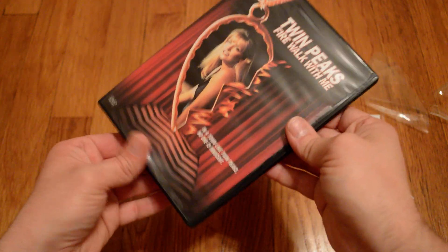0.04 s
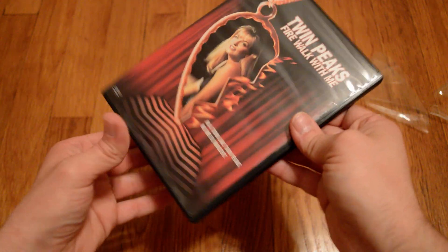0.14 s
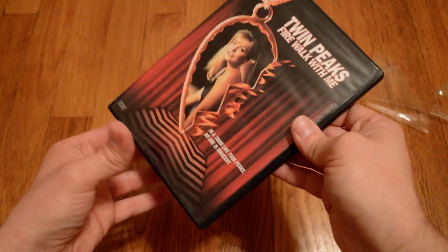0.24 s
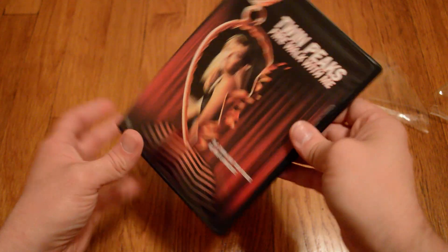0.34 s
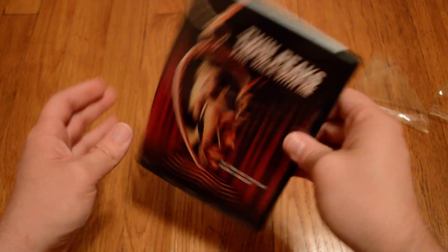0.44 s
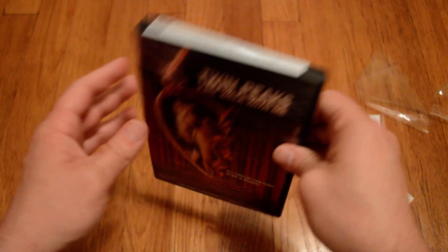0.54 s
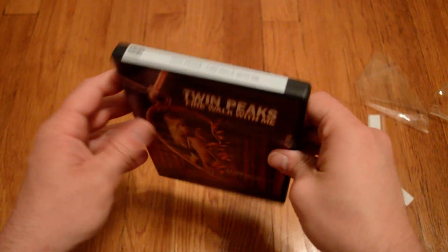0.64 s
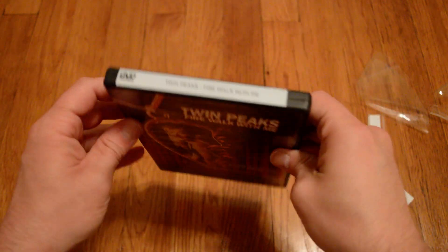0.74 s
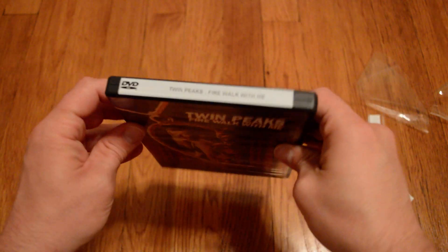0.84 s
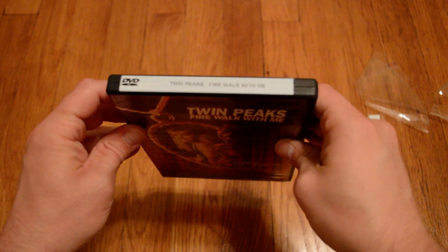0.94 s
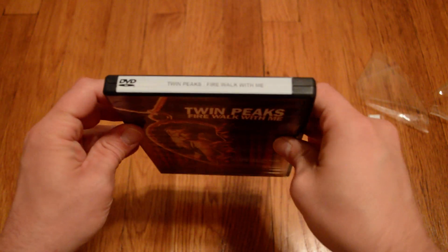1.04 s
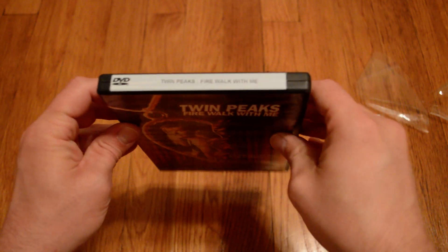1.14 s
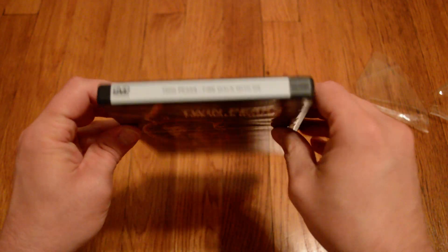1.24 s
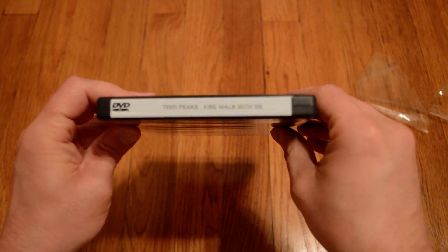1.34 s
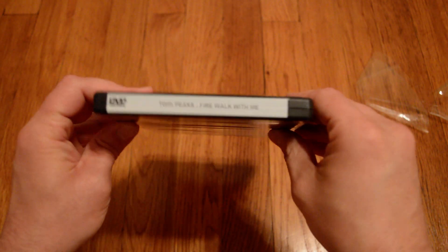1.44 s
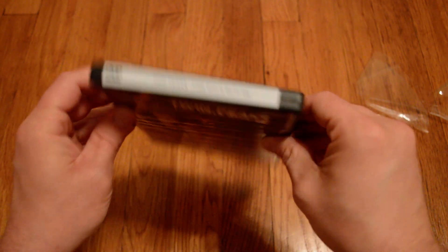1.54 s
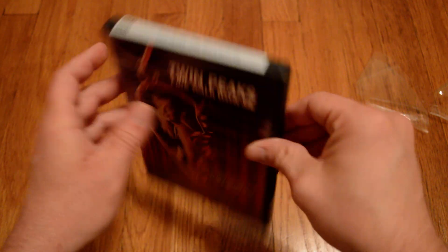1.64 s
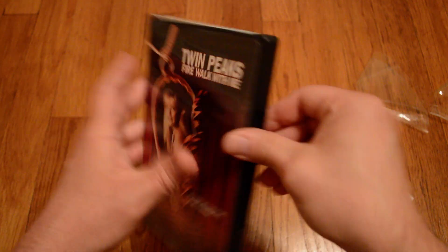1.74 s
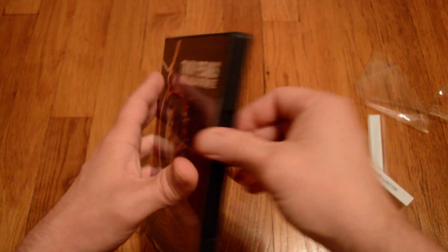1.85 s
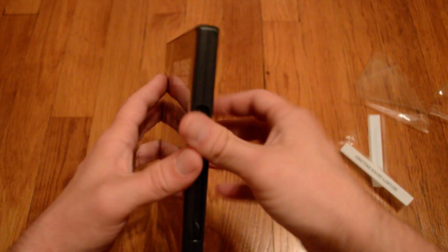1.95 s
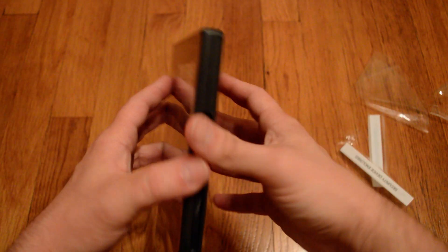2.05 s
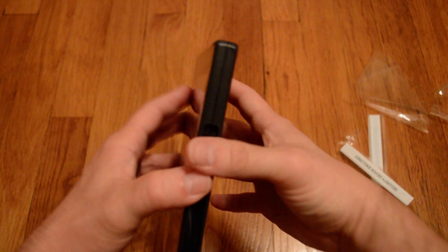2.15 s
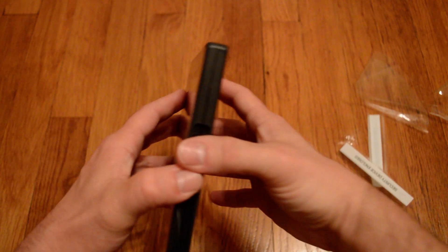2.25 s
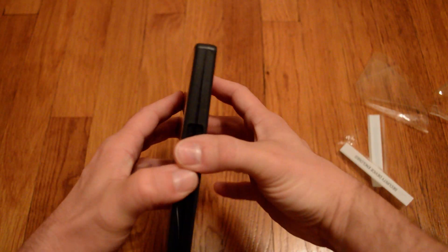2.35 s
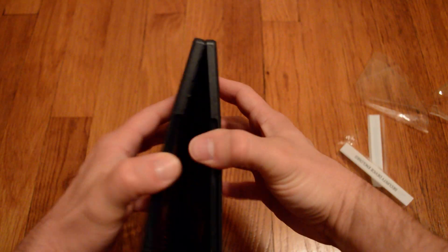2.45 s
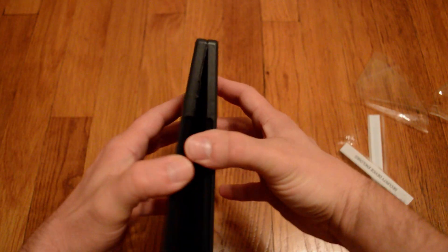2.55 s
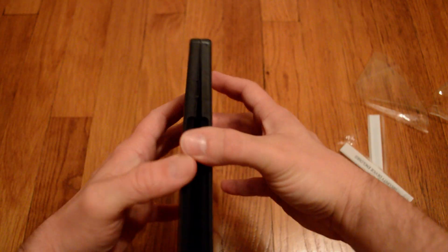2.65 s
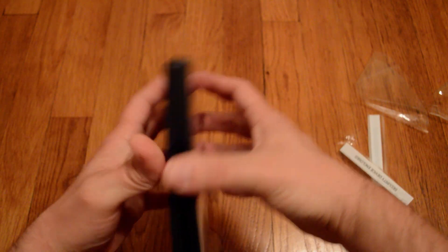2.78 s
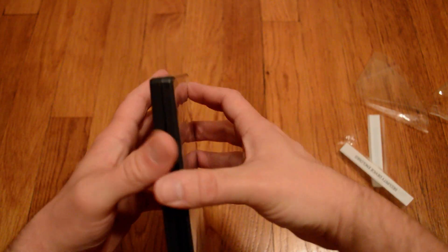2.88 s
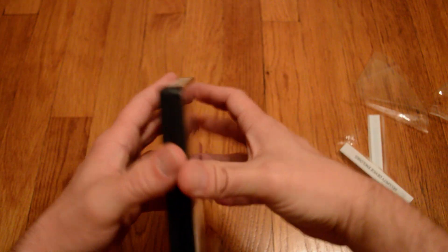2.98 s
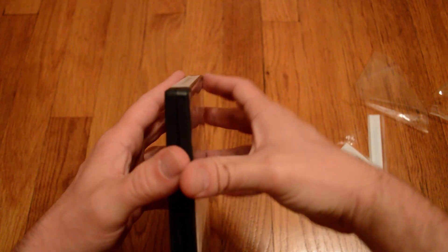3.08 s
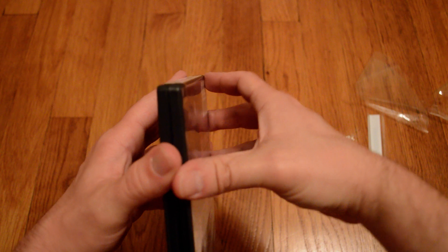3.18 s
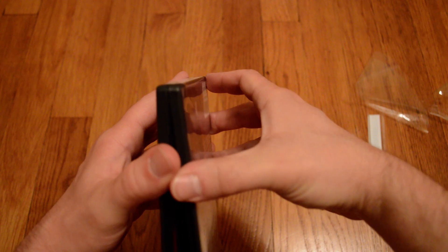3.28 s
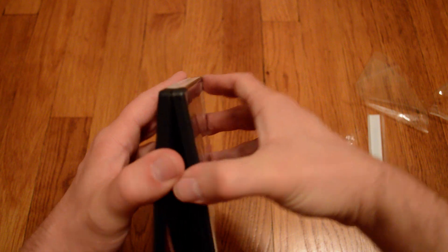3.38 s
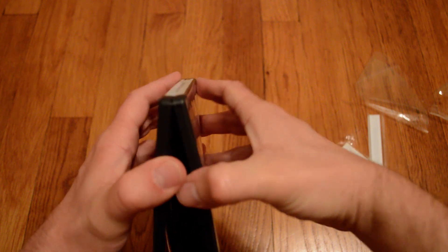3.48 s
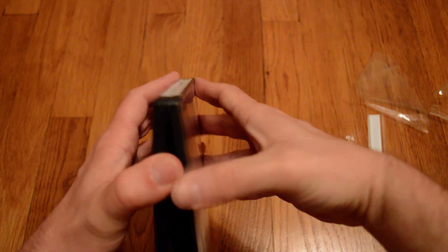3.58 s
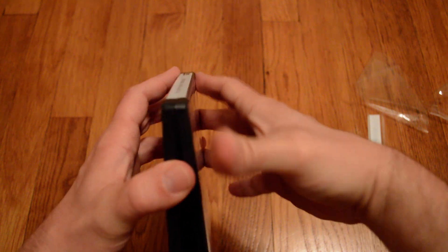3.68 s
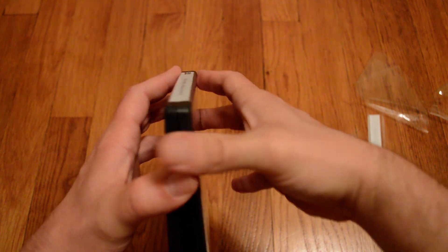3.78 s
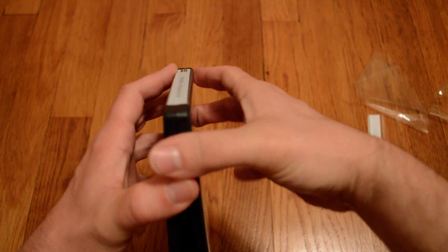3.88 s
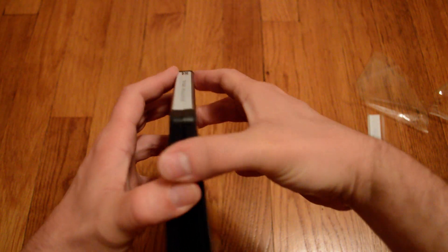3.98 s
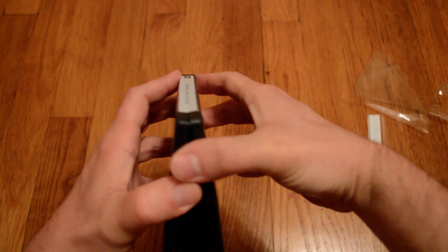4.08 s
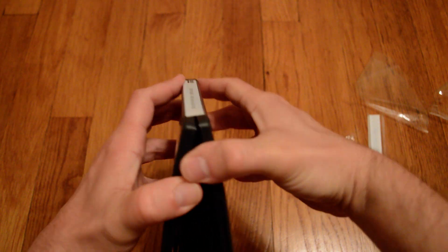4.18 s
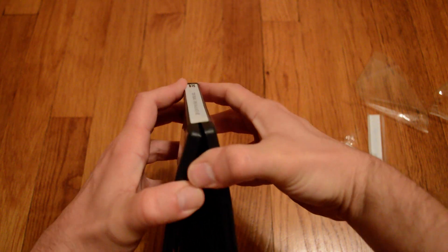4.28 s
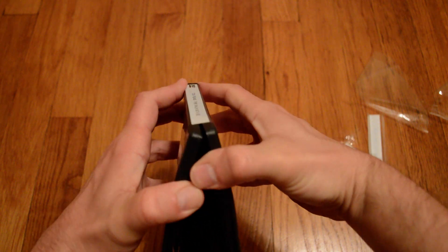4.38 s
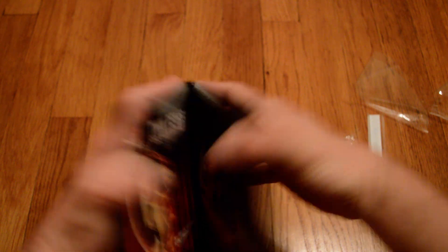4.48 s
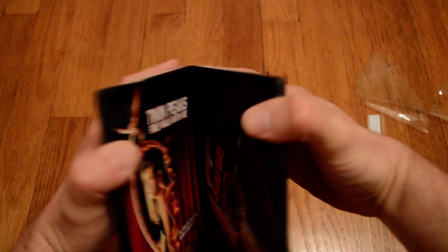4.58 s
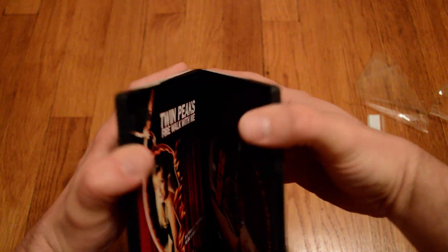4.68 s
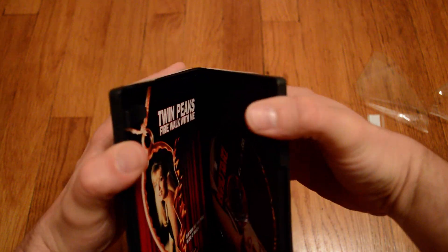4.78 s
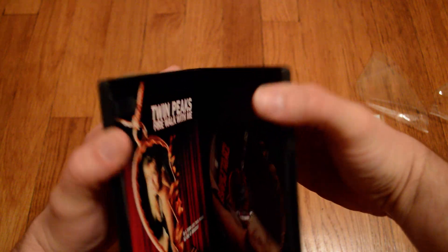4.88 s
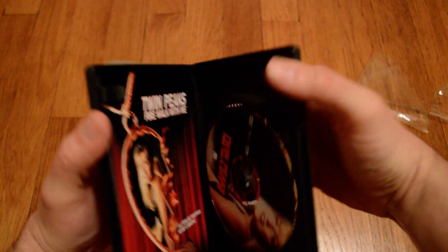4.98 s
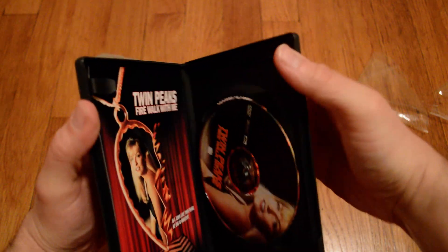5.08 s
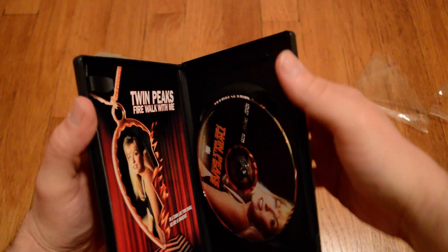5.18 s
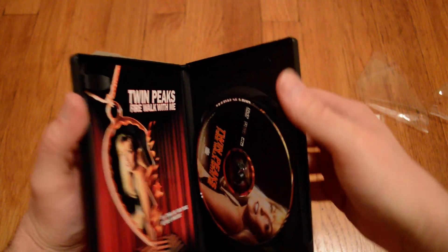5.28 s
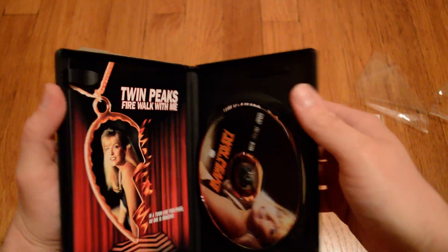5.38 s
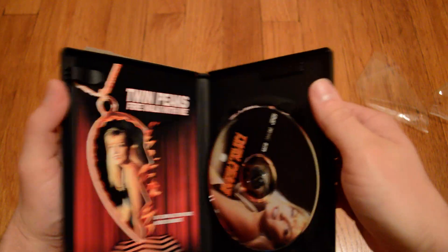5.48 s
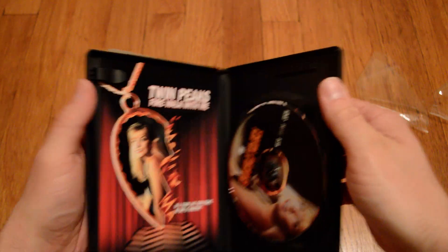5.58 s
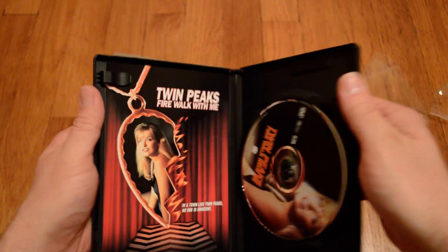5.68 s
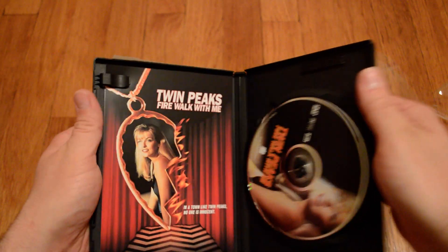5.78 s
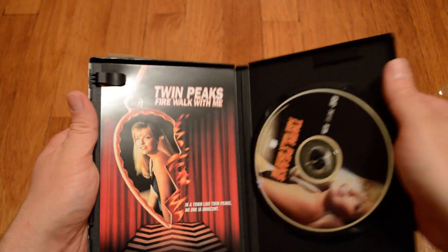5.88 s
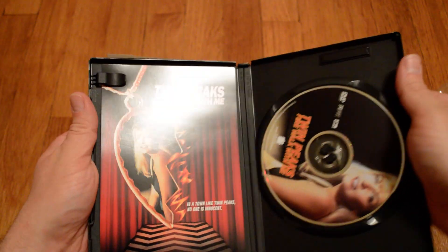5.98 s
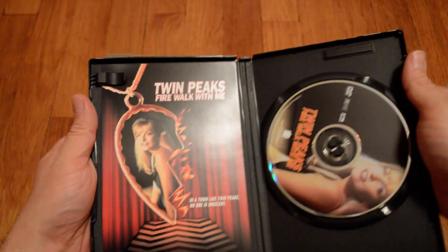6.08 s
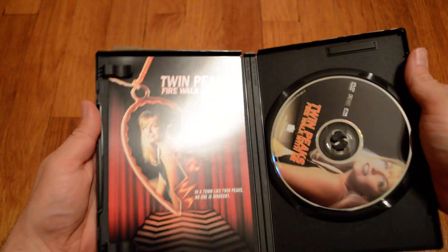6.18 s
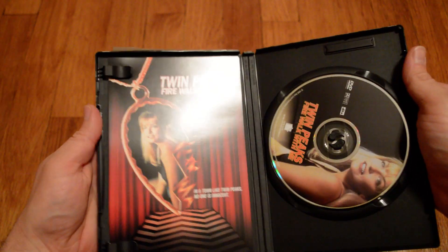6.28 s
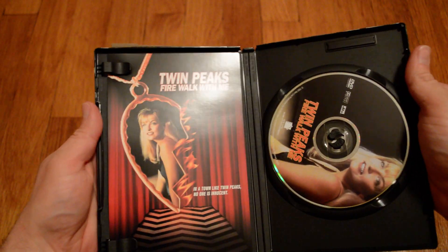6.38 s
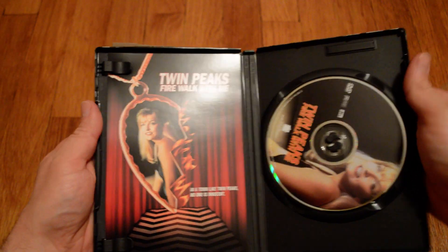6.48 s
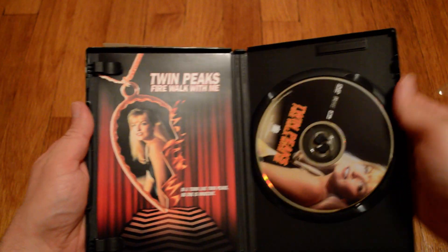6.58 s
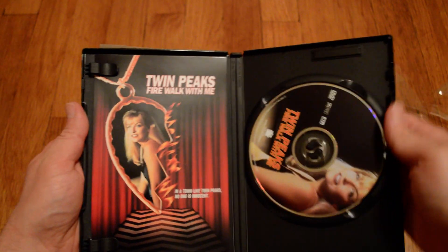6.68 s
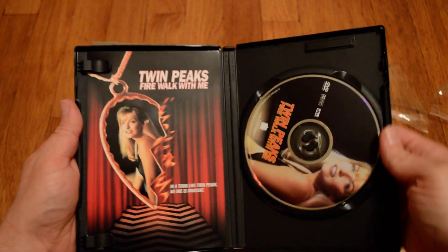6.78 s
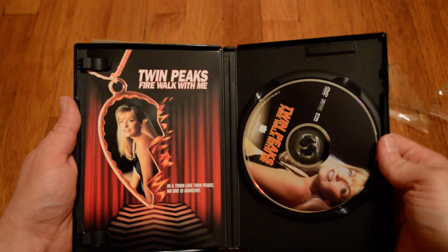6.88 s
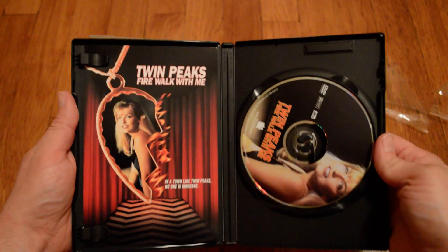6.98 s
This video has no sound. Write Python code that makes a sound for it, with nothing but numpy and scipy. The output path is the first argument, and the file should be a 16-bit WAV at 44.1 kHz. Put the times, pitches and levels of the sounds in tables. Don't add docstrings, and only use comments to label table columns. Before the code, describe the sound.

Close to a camera microphone in a hard, bare-floored room, fingers tap and slide on a hollow plastic case with crisp sticky ticks. After quiet handling, one latch snaps sharply and crunches. Softer prying knocks and creaks follow, then a brighter, louder latch snap and an even louder opening crack with brief rattle, both overloading and echoing. Light touches end it over motor whirr, hum and hiss.

```python
import sys
import numpy as np
from scipy import signal
from scipy.io import wavfile

SR = 44100
rng = np.random.default_rng(int(sys.argv[2]) if len(sys.argv) > 2 else 0)


def transcribe(signal):
    frames = np.atleast_2d(signal).T
    limited = np.clip(frames, -1, 1)
    pcm = np.round(limited * 32767).astype(np.int16)
    wavfile.write(sys.argv[1], SR, pcm)


def ratio(d):
    e = np.asarray(d, float) / 20
    return 10 ** e


N = 310177

# mode_hz, width_hz, level_db
SHELL_MODES = [(740, 140, -6), (960, 93, 1), (1134, 193, 0.5), (1290, 440, -4), (1680, 260, 4),
               (2066, 900, 0), (2470, 484, 3)]
# mode_hz, width_hz, level_db
LATCH_MODES = [(2770, 710, 1), (3502, 440, 1.5), (4023, 200, 2.5), (4360, 550, -0.5), (5400, 346, 0),
               (6040, 680, -0.5), (6680, 810, -9.5)]


def rms_one(x):
    return x / np.sqrt(np.mean(x ** 2) + 1e-20)


def at_hz(points, hz):
    table_hz, values = np.array(points).T
    return np.interp(np.log(hz), np.log(table_hz), values)


def band(x, lo_hz, hi_hz):
    return signal.sosfilt(signal.butter(2, [lo_hz, min(hi_hz, .45 * SR)], "band", fs=SR, output="sos"), x)


def soften(x, hz):
    return signal.sosfilt(signal.butter(2, min(hz, .45 * SR), fs=SR, output="sos"), x)


def drift(rate_hz):
    r = np.exp(-2 * np.pi * rate_hz / SR)
    wander = signal.lfilter([1], [1, -2 * r, r * r], rng.standard_normal(N + SR))
    return rms_one(wander[SR:])


def resonate(x, hz, width_hz):
    r = np.exp(-np.pi * width_hz / SR)
    feedback = [1, -2 * r * np.cos(2 * np.pi * hz / SR), r * r]
    return signal.lfilter(np.array([1, 0, -1]) * (1 - r * r) / 2, feedback, x)


def ring_modes(x, modes, extra_db=None):
    out = 0
    for j, (hz, width_hz, db) in enumerate(modes):
        gain_db = db if extra_db is None else db + extra_db[j]
        out = out + (-1) ** j * ratio(gain_db) * resonate(x, hz, width_hz)
    return out


def coloured(size, spectrum, t60=None):
    out = 0
    edges = 20 * 2 ** (np.arange(61) / 6)
    white = rng.standard_normal((2, size))
    for k, (lo, hi) in enumerate(zip(edges, edges[1:])):
        hz = np.sqrt(lo * hi)
        fade_db = 0 if t60 is None else -60 * np.arange(size) / SR / at_hz(t60, hz)
        out = out + ratio(at_hz(spectrum, hz) + fade_db) * band(white[k % 2], lo, hi)
    return rms_one(out)


def add(track, start_s, peak_db, sound):
    i = round(start_s * SR)
    track[i:i + len(sound)] += ratio(peak_db) * sound[:N - i] / np.abs(sound).max()


def burst(chance, seconds, size, abrupt=0.63):
    x = np.zeros(size)
    x[0] = 1
    for share in chance:
        lag = max(round(share * seconds * SR), 1)
        gap = np.zeros(lag - 1)
        x = signal.lfilter(np.r_[-abrupt, gap, 1], np.r_[1, gap, -abrupt], x + 1e-18)
    return x


def knocks():
    # start_s, shell_peak_db, ring_hz,
    # latch_db and edge_db (both relative to the shell)
    snaps = [
        (2.3925, -4, 510, -13.5, -20),
        (2.3972, 0.5, 950, -10, -15),
        (4.197, 4, 1500, 4, -2.5),
        (4.2, -4.5, 1177, 4.5, -2),
        (4.2049, -7, 1172, -7, -13),
        (4.4763, 9, 1150, 0.5, -3),
        (4.4837, -8, 1300, 3, 5.5),
        (4.489, -6.5, 1703, 3, 10),
        (4.492, -7, 1100, 3, 6.5),
    ]
    # start_s, shell_peak_db, ring_hz, brightness_db
    taps = [(0.068, -23.5, 1290, -15), (0.087, -19, 750, -1), (0.102, -22, 1260, -8), (0.13, -22, 676, -14),
            (0.159, -38, 684, -11), (1.914, -36, 1100, -9), (2.186, -23, 1290, -11.5),
            (2.213, -26, 678, -12), (2.697, -25.5, 965, -14), (2.708, -33.5, 929, -22),
            (2.855, -22, 1025, -21), (2.867, -31, 1380, -23), (3.275, -25, 980, -25.5),
            (3.369, -45, 950, -6), (3.62, -14.5, 1018, -14.5), (5.49, -30.5, 1320, -11),
            (6.535, -31.5, 1290, -22)]
    # start_s, shell_peak_db, ring_hz, brightness_db
    chatter = [(1.193, -42, 1250, -17), (1.668, -39.5, 1294, -5), (1.873, -33.5, 800, 8),
               (2.243, -30.5, 1100, -12), (2.406, -15.5, 1020, -5), (2.418, -16.5, 982, -4),
               (2.424, -14.5, 1660, -12), (2.435, -8, 1140, -14), (3.299, -30, 970, -20),
               (3.632, -14, 1075, -10), (3.65, -14, 970, -16), (3.673, -24, 929, -13),
               (4.036, -27.5, 1260, -15), (4.049, -29.5, 847, -17), (4.096, -35, 947, -9),
               (4.427, -19.5, 1035, 3.5), (4.436, -20, 1057, 5), (5.444, -45, 1168, -21)]
    # mode_hz, width_hz, level_db
    panel_modes = [(73.2, 65, -3), (165.8, 33, 6), (258, 230, 2.5), (363, 89.2, 7.5), (630, 76, -5.5)]
    # mode_hz, width_hz, level_db
    edge_modes = [(7525, 1100, 2.5), (9440, 1400, 1.5), (12000, 3300, -4), (14300, 3000, -18)]

    rows = []
    for table, panel_db in ((taps, -13.5), (chatter, -20.5)):
        for s, db, hz, bright_db in table:
            rows.append((s, db, hz, panel_db, bright_db, bright_db - 3.5))
    for s, db, hz, latch_db, edge_db in snaps:
        rows.append((s, db, hz, -24, latch_db, edge_db))

    out = np.zeros(N)
    chance = rng.random((len(rows), 40))
    for (s, db, hz, panel_db, latch_db, edge_db), luck in zip(rows, chance):
        force = min(ratio(db + 5.0), 1)
        hit = burst(luck[:4], .001 - .00045 * force, size=2600, abrupt=.5 + .25 * force)
        latch_hz = 6500 if edge_db > latch_db - 5 else 3500
        # modes, level_db, favoured_hz, loss_db per octave away from it
        parts = [(panel_modes, panel_db, hz, 0), (SHELL_MODES, 0, hz, 24 - 14 * force),
                 (LATCH_MODES, latch_db, latch_hz, 5), (edge_modes, edge_db, hz, 0)]
        for k, (modes, part_db, lead_hz, damp) in enumerate(parts):
            grip_db = [-damp * abs(np.log2(mode[0] / lead_hz)) + 5 * luck[-1 - 8 * k - j]
                       for j, mode in enumerate(modes)]
            ring = soften(ring_modes(hit, modes, grip_db), 2.0 * modes[-1][0])
            add(out, s - .0012 * (1 - force), db + part_db, ring)
    return out


def rings():
    # start_s, peak_db, mode_hz
    firm_rings = [(.088, -22.5, 2280), (.132, -27, 2350), (.133, -29, 4170), (2.187, -37, 70),
                  (2.395, -24, 210), (2.3953, -8, 1670), (2.398, -32, 3050), (2.709, -25, 954),
                  (2.858, -27, 1670), (2.987, -37, 1290), (3.271, -34.5, 960), (3.620, -29.5, 234),
                  (3.633, -19.5, 1830), (3.634, -18, 2880), (3.650, -18.5, 2200), (4.197, 1.5, 1680),
                  (4.197, 3.5, 3810), (4.1975, -0.5, 2930), (4.1975, -4.5, 5930), (4.198, -10, 781),
                  (4.477, -2, 2290), (4.198, -3.5, 1100), (4.426, -19, 1030), (4.4357, -17, 1100),
                  (4.478, -26, 79), (5.49, -40, 420), (6.535, -38, 500)]
    # start_s, peak_db, mode_hz
    loose_rings = [(.130, -32.5, 740), (1.195, -41.5, 740), (1.872, -26.5, 5420), (1.8721, -24, 3100),
                   (3.369, -43.5, 3190), (1.915, -38.5, 793), (2.1857, -19, 1120), (2.1856, -19.5, 1300),
                   (2.186, -29.5, 402), (2.213, -33, 3210), (2.435, -26, 6440), (3.651, -35.5, 6800),
                   (4.49, -4.5, 7340), (5.445, -42.5, 851)]

    rows = [(*row, .13) for row in firm_rings] + [(*row, .036) for row in loose_rings]
    out = np.zeros(N)
    for (s, db, hz, loss), luck in zip(rows, rng.random((len(rows), 3))):
        width_hz = 24 + loss * hz
        click = burst(luck, .0003, size=2600)
        add(out, s, db, resonate(resonate(click, hz, width_hz), hz, 4 * width_hz))
    return out


def strokes(table, dull, bright):
    out = np.zeros(N)
    t = np.arange(N) / SR
    for s, dull_db, bright_db, swell_s, fade_s in table:
        shape = ratio(-25 * np.maximum((s - t) / swell_s, (t - s) / fade_s))
        out += shape * (ratio(dull_db) * dull + ratio(bright_db) * bright)
    return out


def rubs():
    # strongest_s, dull_db, bright_db, swell_s, fade_s
    slides = [(.07, -47, -37.5, 0.027, .022), (.13, -43.5, -52, .06, 0.068),
              (.724, -51, -49.5, 0.044, 0.21), (.886, -45, -38.5, 0.0092, 0.052),
              (.924, -53, -57.5, 0.028, 0.35), (1.045, -59, -58.5, 0.063, 0.11),
              (1.218, -63, -62, .05, 0.1), (1.876, -37.5, -42.5, 0.037, 0.011),
              (1.885, -50, -55, .008, .18), (4.04, -62.5, -63.5, .04, .04),
              (4.16, -60.5, -65.5, .11, 0.035), (5.554, -65, -58, 0.092, 0.045),
              (6.166, -61.5, -58.5, .12, 0.19), (6.524, -60.5, -64, .012, 0.21)]
    # strongest_s, mid_db, bright_db, swell_s, fade_s
    crunch = [
        (2.415, -28, -34.5, 0.017, 0.062),
        (3.648, -35.5, -45.5, 0.047, 0.11),
    ]

    strength = ratio(1.4 * np.minimum(rng.exponential(1, N), 5))
    happens = rng.random(N) < 4000 / SR
    slips = strength * rng.standard_normal(N) * happens
    dull = rms_one(ring_modes(slips, LATCH_MODES))
    bright = rms_one(band(slips, 5800, 15000))
    mid = rms_one(ring_modes(slips, SHELL_MODES[4:] + LATCH_MODES[:3]))
    bright_grind = rms_one(band(slips, 2930, 12000))
    return strokes(slides, dull, bright) + strokes(crunch, mid, bright_grind)


def ticks():
    # start_s, peak_db, centre_hz
    skin_ticks = [(0.0692, -21.5, 7040), (0.084, -25, 5440), (0.0875, -13, 7000), (0.1203, -15.5, 7560),
                  (0.7137, -32.5, 7700), (0.7267, -32.5, 3400), (0.7882, -27.5, 5400), (0.8848, -28, 5670),
                  (0.8962, -32, 3186), (1.035, -31.5, 3380), (2.2133, -29, 3150), (2.241, -33, 3280),
                  (2.9933, -33.5, 3540), (4.037, -32.5, 2730), (0.7171, -33, 9000), (2.697, -39, 10500),
                  (4.9801, -31.5, 3230), (6.526, -38.5, 2600)]
    # start_s, peak_db, centre_hz
    nail_ticks = [(0.0554, -39.5, 8300), (.060, -27, 7500), (0.0641, -32, 7760), (.078, -33.5, 5800),
                  (0.096, -35, 7550), (0.117, -37, 6500), (0.5194, -48, 9590), (.612, -44.5, 10730),
                  (0.626, -42, 7040), (0.902, -32, 10400), (0.8966, -31, 11000), (1.0474, -38, 3790),
                  (1.2125, -40, 11700), (1.247, -41, 9000), (1.2591, -47, 11900), (1.5544, -44, 12000),
                  (1.85, -36, 5400), (1.860, -36, 5400), (1.9759, -39.5, 12600), (2.1764, -42, 3260),
                  (2.435, -21, 6860), (2.6115, -39, 8200), (2.735, -34, 9850), (.05, -47.5, 8000),
                  (2.995, -38, 11100), (3.650, -25, 6900), (4.0846, -41.5, 8150), (4.19, -44, 8000),
                  (4.938, -30, 10700)]

    rows = [(*row, .2) for row in skin_ticks] + [(*row, .7) for row in nail_ticks]
    out = np.zeros(N)
    for (s, db, hz, sharp), luck in zip(rows, rng.random((len(rows), 4))):
        hit = burst(luck, .0004, size=800)
        centre = resonate(resonate(hit, hz, .5 * hz), hz, 0.37 * hz)
        add(out, s, db, sharp * 5 * centre + (1 - sharp) * band(hit, 0.57 * hz, 1.1 * hz))
    return out


def room(x):
    # band_hz, t60_s
    t60 = [(150, 0.64), (400, 0.69), (1000, 0.61), (2800, 0.78), (6000, 0.66), (9000, 0.58), (12000, 0.46),
           (15500, 0.4)]
    # band_hz, level_db
    colour = [(80, -13), (200, -6.5), (500, 0), (1500, -2), (4000, 1.5), (9000, -2), (15000, 1.45)]
    # delay_s, level_db
    echoes = [
        (.0065, -14),
        (.0105, -19),
        (.034, -21),
    ]

    t = np.arange(SR) / SR
    tail = coloured(SR, colour, t60) * np.clip((t - .004) / 0.012, 0, 1)
    response = ratio(-5.5) * tail / np.sqrt(np.sum(tail ** 2))
    for s, db in echoes:
        response[round(s * SR)] += ratio(db)
    return signal.fftconvolve(x, response)[:N]


def lens_motor():
    # mode_hz, width_hz, level_db
    housing = [(1104, 210, -9), (1260, 100, 2.5), (1410, 82, -6), (1543, 80, -71.5), (2090, 92, -15.5)]

    rattle = rng.standard_normal(N) * ratio(1.7 * drift(45) + 1.1 * drift(2.9))
    whirr = 0
    for j, (hz, width_hz, db) in enumerate(housing):
        whirr = whirr + (-1) ** j * ratio(db) * resonate(resonate(rattle, hz, 3 * width_hz), hz, width_hz)
    return ratio(-47) * rms_one(whirr)


def surges():
    # start_s, peak_db
    catches = [(0.3903, -32), (0.4745, -42), (0.7038, -30), (0.8662, -32), (1.0672, -29.5), (1.2836, -31),
               (1.9808, -31.5), (2.0183, -29.5), (3.128, -39), (3.1838, -34), (5.074, -34.5), (5.332, -33),
               (5.344, -36), (5.5283, -31), (5.8471, -32), (5.9189, -32), (6.4141, -30.5), (6.7161, -32.5),
               (6.8734, -32)]

    out = np.zeros(N)
    t = np.arange(900) / SR
    for (s, db), luck in zip(catches, rng.standard_normal((len(catches), 2))):
        tone = np.sin(2 * np.pi * (1260 + 45 * luck[0]) * t + 3 * luck[1])
        add(out, s, db - 4.5, np.exp(-((t - .004) / 0.0033) ** 2) * tone)
    return out


def electronics():
    # partial_hz, rms_db
    hum_partials = [(60, -72.5), (120, -67.5), (179, -77.5), (240, -64), (300, -70.5), (384, -72)]
    # band_hz, density_db (per Hz)
    hiss_colour = [(25, -16), (130, -12), (300, -15), (700, -15), (1700, -19), (2400, -23), (5500, -27.5),
                   (15000, -34)]

    t = np.arange(N) / SR
    hum = 0
    for hz, db in hum_partials:
        level = ratio(db + 2.6 * drift(2.7)) * np.sqrt(2)
        hum = hum + level * np.sin(2 * np.pi * hz * t + 0.54 * drift(3.3))
    whistle = ratio(-67) * np.sqrt(2) * np.sin(2 * np.pi * 15712 * t)
    return hum + whistle + ratio(-52.5) * coloured(N, hiss_colour)


def scene():
    case = soften(knocks() + rings(), 16000) + rubs()
    skin = ticks()
    reverb = room(case + ratio(-3.5) * skin)
    camera = lens_motor() + surges() + electronics()
    return (case + skin + reverb + camera)[None, :]


def roll_off(x):
    return signal.sosfilt(signal.butter(12, 16220, fs=SR, output="sos"), x)


def record(dry):
    flat = np.clip(dry, -.99, .99)
    mix = signal.sosfilt(signal.butter(2, 40, "high", fs=SR, output="sos"), flat)
    return roll_off(mix)


dry = scene()
out = record(dry)
transcribe(out)
```